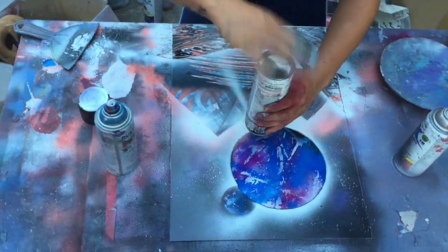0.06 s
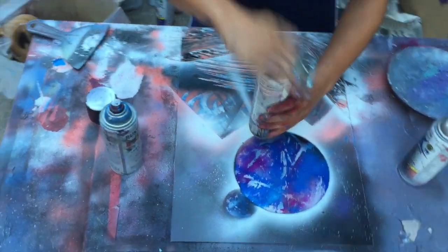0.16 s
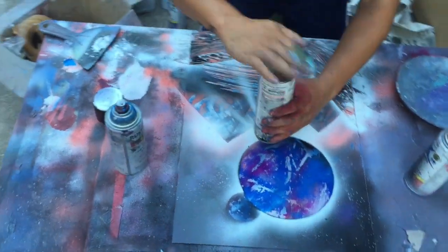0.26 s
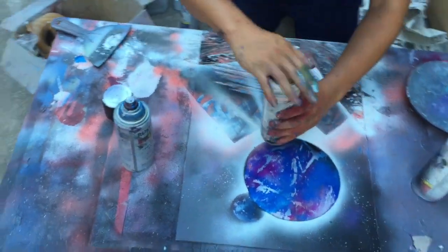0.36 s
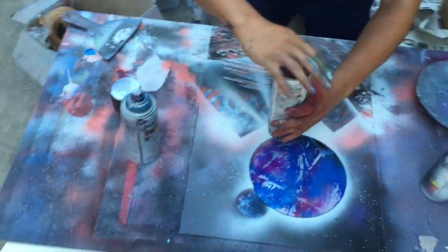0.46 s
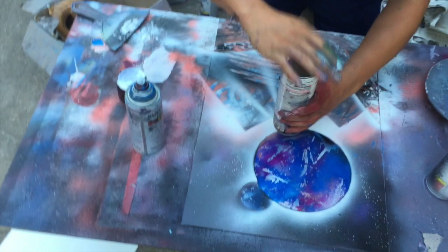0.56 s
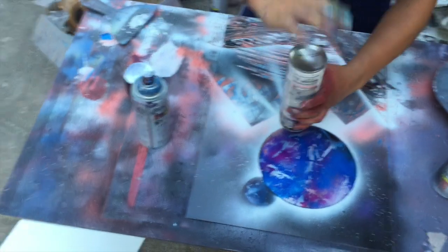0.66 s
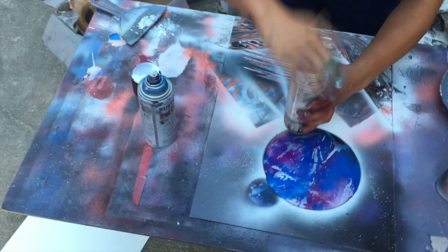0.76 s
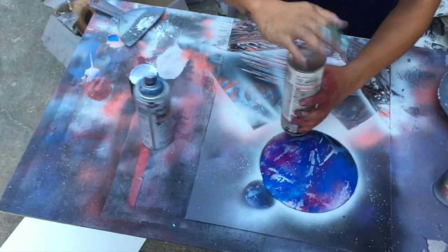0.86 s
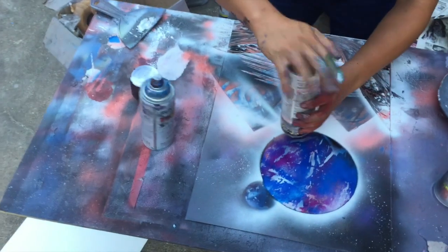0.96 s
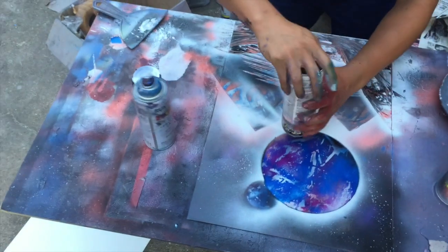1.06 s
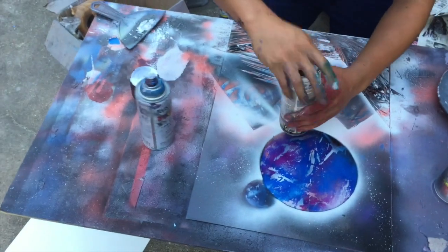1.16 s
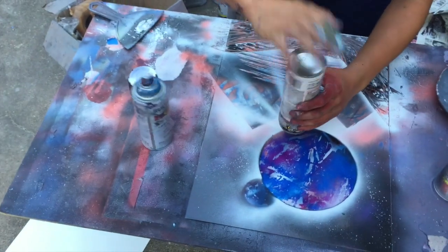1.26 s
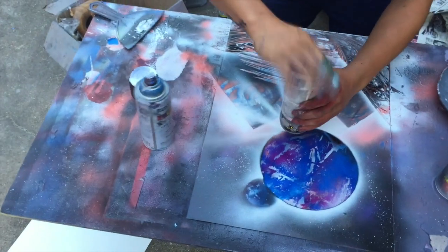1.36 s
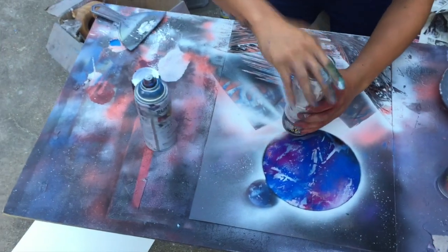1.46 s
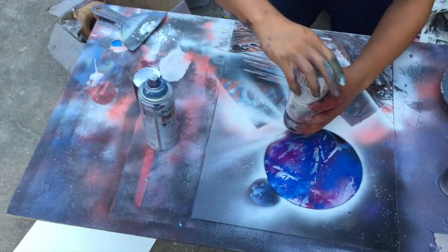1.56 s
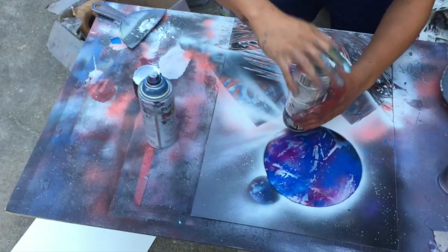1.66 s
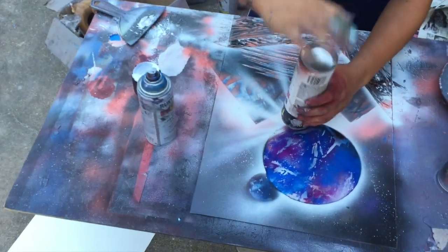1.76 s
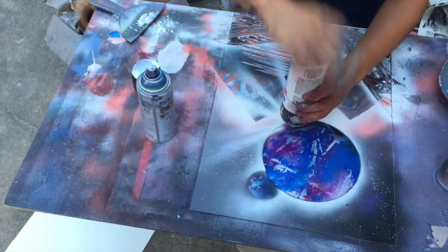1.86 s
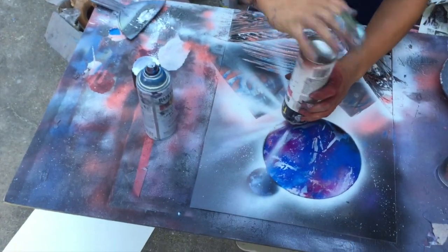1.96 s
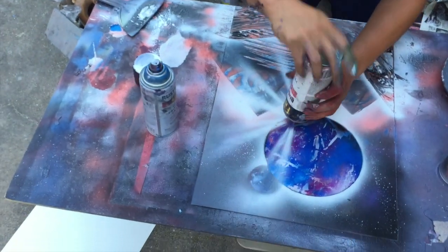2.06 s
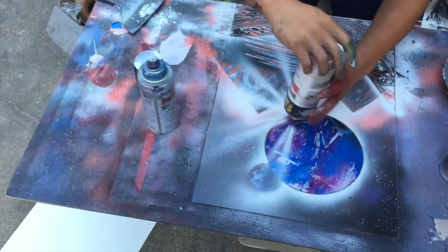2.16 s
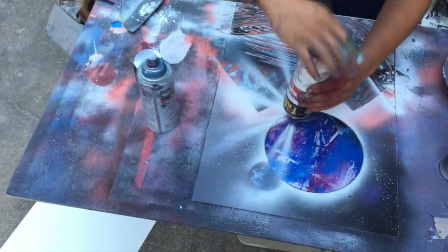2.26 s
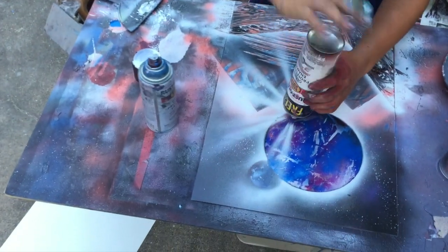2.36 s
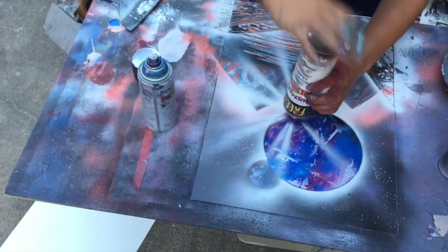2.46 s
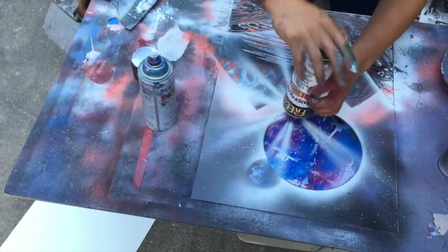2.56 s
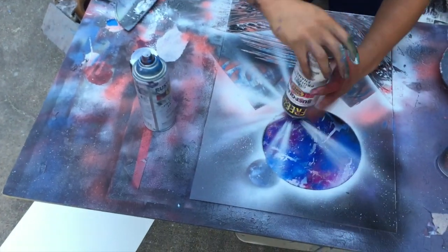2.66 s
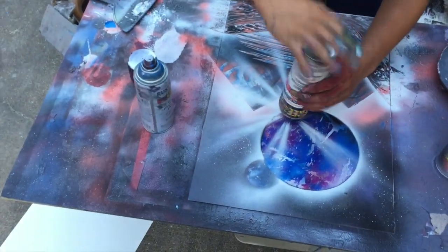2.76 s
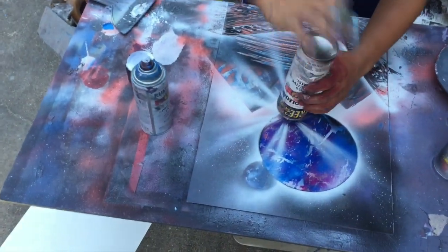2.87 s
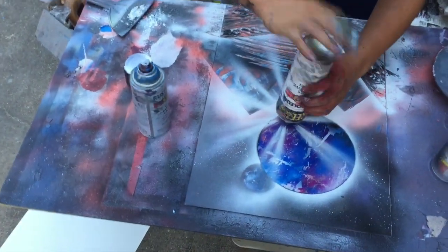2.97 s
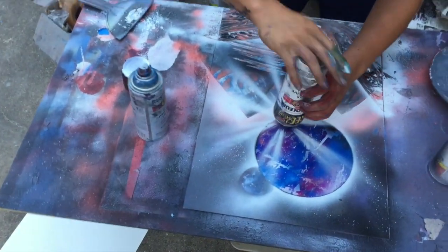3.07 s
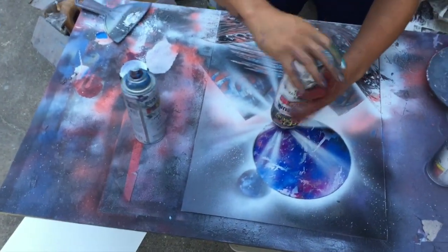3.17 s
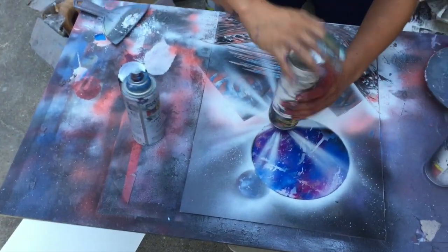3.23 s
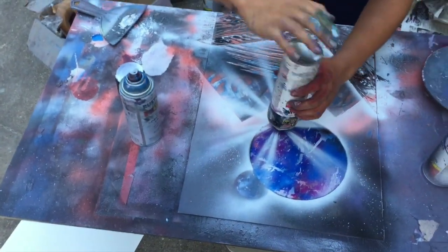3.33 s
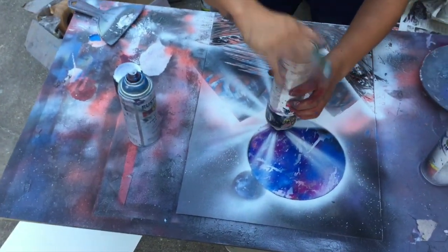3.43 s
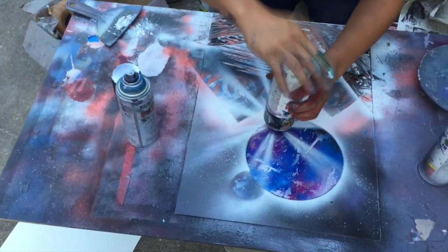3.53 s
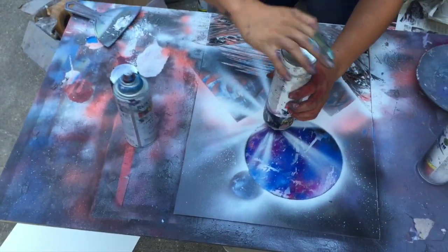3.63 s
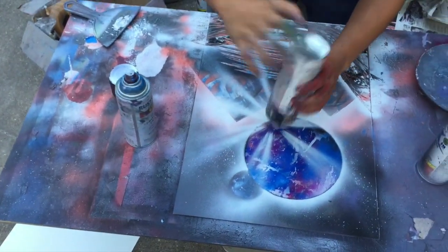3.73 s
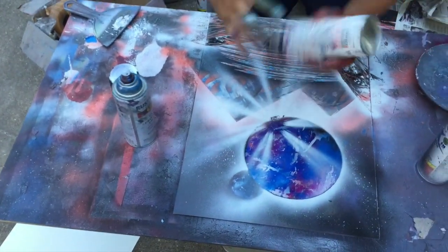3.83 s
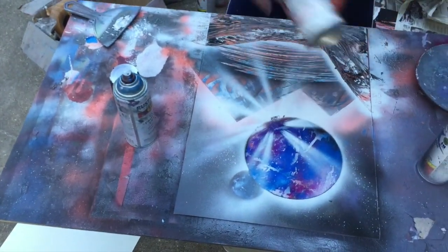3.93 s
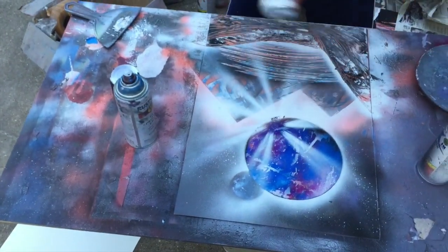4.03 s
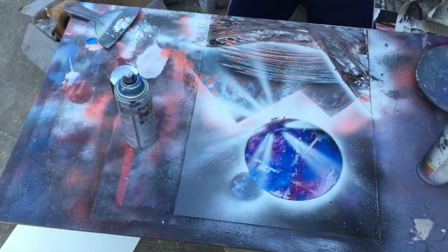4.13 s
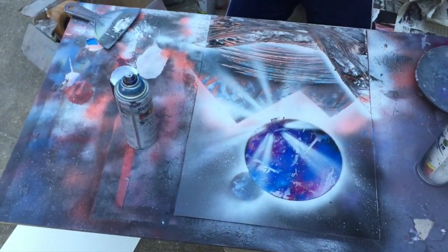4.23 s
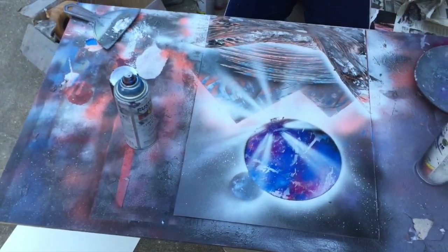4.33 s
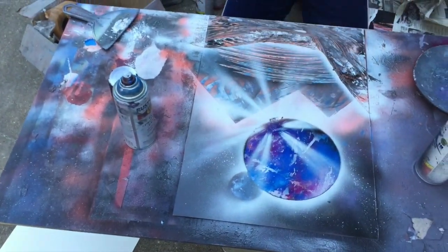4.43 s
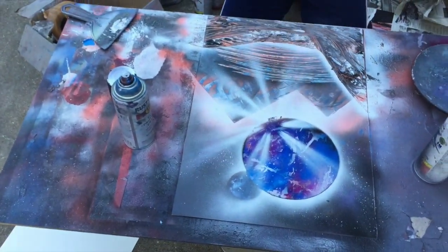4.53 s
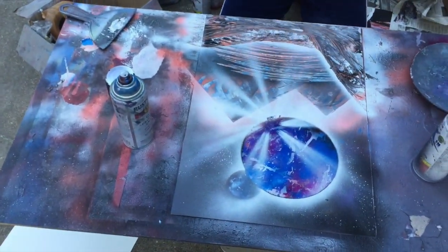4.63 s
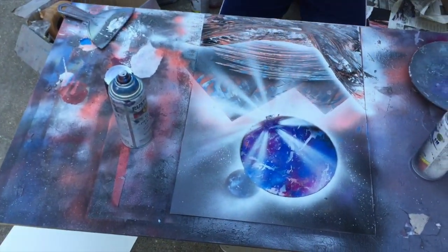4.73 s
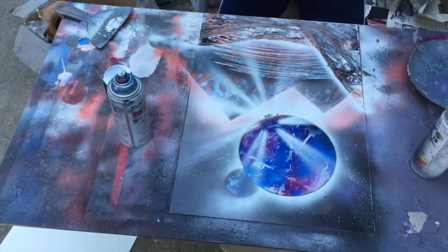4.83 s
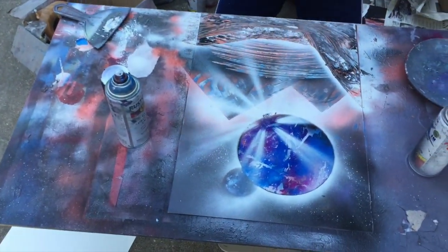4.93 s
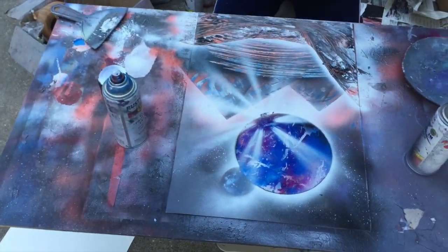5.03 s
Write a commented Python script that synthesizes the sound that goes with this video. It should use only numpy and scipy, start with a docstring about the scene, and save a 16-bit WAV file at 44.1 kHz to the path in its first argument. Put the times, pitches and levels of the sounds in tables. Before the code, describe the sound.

Pairs of hollow thumps from a spray can slapped on a table, with faint paint puffs, followed by light metallic rattling.

```python
"""First come pairs of pops and thuds: a palm slaps the base of a spray can standing upside down on a table.
Each tap thuds and bounces through the table, puffs paint from the nozzle and jogs the mixing ball.
Then the can is carried off, the ball clacking on the steel, with a thin hiss near the end.
One microphone hears it all in a quiet, open workshop."""
import sys
import numpy as np
from scipy import signal
from scipy.fft import rfft, irfft, next_fast_len
from scipy.io import wavfile
from scipy.ndimage import uniform_filter1d, map_coordinates

SR = 44100
rng = np.random.default_rng(int(sys.argv[2]) if len(sys.argv) > 2 else 0)


def put_to_file(sound):
    """Save the sound as 16-bit audio at rate SR, in the file named by the first command-line argument."""
    columns = np.atleast_2d(sound).T  # one column per channel
    safe = np.clip(columns, -1, 1)
    whole_steps = np.round(safe * 32767)
    wavfile.write(sys.argv[1], SR, whole_steps.astype(np.int16))


N = 224833

# Palm taps, in pairs: (time [s], push level [dB], push pitch [Hz], pop level [dB], pop pitch [Hz],
# rebound delay [s], rebound level [dB], settling delay [s], settling level [dB], puff level [dB],
# valve open [s], skip level [dB])
PALM_TAPS = [(0.2702, -31.5, 127, -38, 1734, .015, -42.5, 0.026, -36.5, -60.5, 0.042, -47),
             (0.3963, -29, 172, -58, 1630, .017, -40.5, 0.035, -45.5, -59, 0.049, -53.5),
             (0.8676, -26.5, 164, -40, 1586, 0.018, -35.5, 0.042, -36.5, -57, 0.037, -46),
             (1.0045, -23, 168, -46, 1650, .019, -28, 0.052, -33, -55, 0.049, -33.5),
             (1.4372, -27, 168, -38, 1720, .016, -37, 0.033, -39, -56, 0.027, -62),
             (1.562, -24.5, 174.5, -53, 1590, 0.024, -33.5, 0.053, -41, -55.5, .048, -40),
             (1.9785, -23.5, 151, -48, 1524, .015, -34, 0.033, -32, -53.5, .022, -43),
             (2.108, -22.5, 180, -44, 1740, 0.019, -30, 0.048, -33.5, -54, 0.038, -35.5),
             (2.509, -23.5, 155, -35.5, 1595, 0.015, -33, 0.038, -32.5, -55, 0.035, -42),
             (2.6293, -22, 165, -43.5, 1920, .018, -31, 0.041, -37, -55, .041, -35),
             (3.0005, -26, 172, -37, 1860, .016, -32, 0.031, -42, -57, 0.027, -45),
             (3.125, -23, 168, -39, 1885, .021, -33, 0.047, -36, -59, 0.064, -32),
             (3.496, -27.5, 143.5, -65, 1690, .014, -57, 0.027, -40, -58.5, .033, -80),
             (3.6332, -24, 175, -49, 1680, .018, -32, 0.062, -40, -56.5, 0.031, -36.5)]
# The board gives way just after the pop: (delay on a pair's first tap [s], on its second [s])
PUSH_LAG_S = [0.00397, 0.00084]
# The hand shifts the can on the board: (time [s], level [dB], main pitch [Hz])
NUDGES = [(1.142, -43, 238), (1.305, -46.5, 88), (1.354, -42, 176), (1.389, -48, 68.5), (2.599, -51, 127),
          (2.714, -40, 180), (2.746, -39, 220), (3.953, -51.5, 213)]
# The table's modes, the tones it rings at when hit. Ring time (t60) is how long a fade of 60 dB takes.
# (pitch [Hz], level [dB], ring time [s])
TABLE_MODES = [(72, 3, 0.2), (108, -2, 0.067), (130.5, 2.5, 0.13), (180.8, 8, 0.043), (205.4, 4, 0.078),
               (256.4, 3, 0.1), (316.5, -0.5, 0.077), (384.3, 7.5, 0.066), (505, -4.5, 0.071),
               (624.7, 3, 0.073), (744, -8, 0.04), (1038, -8, 0.055), (1240, -12, 0.025), (1674, 9, 0.017)]
# The steel can's modes: (pitch [Hz], level [dB], ring time [s])
CAN_MODES = [(1330, 2.5, 0.026), (1656, -6, 0.11), (1860, -2, 0.1), (2010, 6.5, 0.034), (2554, 3.5, 0.028),
             (2924, -3, 0.044), (3220, 14.5, 0.0058), (3440, -3, 0.054), (3760, 7.5, 0.017),
             (4188, -8.5, 0.091), (4630, -11.5, 0.18), (5720, 25.5, 0.0085), (6480, 10.5, 0.045),
             (7440, -9, 0.015), (9240, 17, 0.019), (13600, 7, .02)]
# Noise of loose things on the table and of brushing fingers: (frequency [Hz], level [dB])
RATTLE_SPECTRUM = [(300, -30), (700, 3), (1600, -6.5), (2500, -6.5), (3300, -14), (4500, -18.5),
                   (7000, -58)]
# Noise of the nozzle, also used for the ball's cracks: (frequency [Hz], level [dB])
JET_SPECTRUM = [(3000, -40), (4800, -4), (6200, 0), (8500, -1.5), (11500, 0.5), (13000, 0.5), (15500, -12)]
# The last hiss: (time [s], level [dB], length [s], fade [dB/s])
LAST_HISS = [(4.904, -59, .115, 20)]
# Its thin, bright noise: (frequency [Hz], level [dB])
HISS_SPECTRUM = [(3500, -37), (5200, -13), (6100, -5), (7500, -9), (9000, -4), (13600, -2.5), (15500, -13)]
# The ball touches the wall through paint: (time [s], level [dB], main pitch [Hz], ring time scale [x])
BALL_PINGS = [(0.4309, -43, 3440, 0.7), (0.4808, -53, 3440, .6), (0.8854, -39, 3350, 0.98),
              (0.9224, -46, 4200, .9), (0.936, -50.5, 3435, .8), (1.0081, -36, 3500, 0.9),
              (1.0554, -42, 4650, 1.2), (1.5635, -36.5, 3180, 0.73), (1.6142, -45, 4200, 0.99),
              (2.0324, -48, 4190, 1.9), (2.167, -39, 4234, 0.71), (2.601, -46, 3430, .6),
              (2.6524, -37, 3440, .6), (2.6844, -41, 4280, 0.82), (2.7753, -37, 3314, 0.73),
              (3.1474, -45, 4120, 1.2), (3.1714, -43, 4670, 1.6), (3.187, -47, 4220, 0.54),
              (3.1900, -44, 3400, 0.57), (3.1974, -40.5, 4230, .9), (3.255, -42.5, 3354, 0.91),
              (3.281, -43, 3360, 0.85), (3.5127, -31, 3380, 0.51), (3.726, -38, 3515, .8),
              (3.7703, -47, 3475, .8)]
# Fainter touches at random after each tap, one per entry: (main pitch [Hz])
JOG_HZ = [3440, 3440, 3440, 4220, 4200, 4630]
# The ball hits bare wall: (time [s], level [dB], main pitch [Hz], spread [octaves],
# ring time scale [x], second pitch [Hz], its relative level [dB])
BALL_CLACKS = [(2.551, -51.5, 6000, 1.3, 0.34, 9500, -10), (4.012, -38, 3120, 0.24, 1.06, 5900, -19),
               (4.025, -40.5, 2970, 0.42, 0.7, 5900, -13), (4.094, -33.5, 3070, 0.47, 0.68, 1870, -7),
               (4.111, -37.5, 1820, 0.38, 0.28, 9000, -9), (4.341, -48.5, 3000, 0.65, 0.33, 9000, -2),
               (4.357, -45, 4200, 0.44, 0.34, 2080, -0.5), (4.480, -47.5, 2230, 0.65, 0.28, 13600, -14),
               (4.594, -44, 2250, 0.25, 0.55, 6500, -25), (4.627, -49.5, 2960, 0.54, 0.35, 6500, -7),
               (4.713, -48, 1520, 0.19, 0.53, 3000, -20), (4.725, -47.5, 2930, 0.22, .5, 6000, -16),
               (4.963, -38.5, 1330, 0.28, 0.41, 2020, -15.5), (5.005, -59, 2000, 0.8, .43, 4200, -16),
               (5.031, -59, 1670, .3, .5, 3000, -20)]
# The workshop's echo: (frequency [Hz], ring time [s])
ROOM_DECAY = [(100, 0.27), (1000, 0.23), (8000, 0.064)]
# Distant rumble and hiss: (frequency [Hz], level [dB])
AIR_SPECTRUM = [(25, -5), (50, 4.5), (130, 0.5), (380, -9), (700, -12.5), (1200, -13), (3800, -18),
                (7000, -20), (15500, -22.5)]
# The microphone's tone: (frequency [Hz], gain [dB])
MIC_RESPONSE = [(20, -6), (45, 1.5), (70, 4.5), (4300, 1), (5000, -1.5), (5800, 0.5), (9800, -2),
                (10400, -7.5), (11000, -2)]

# Each list holds (first tap of a pair, second tap).
REBOUND_PUSH_DB, REBOUND_TREBLE_DB = [-25, -9], [-19.5, -2]  # relative to the tap's push; to the rap
REBOUND_HZ, SETTLE_HZ = 137, [163, 213]
SKIP_S, SKIP_TREBLE_DB = 0.009, -2  # a quick bright touch ahead of the rebound
SETTLE_RAP_DB, SETTLE_TREBLE_DB = -8.5, -19
ROCK_S, ROCK_DB, ROCK_HZ = 0.025, -13.5, 175  # each rock is about this much later and weaker
PUFF_LAG_S, PUFF_SAG_DB_PER_S = 0.0022, 63
JOG_WINDOW_S, JOG_DB, JOG_FADE_DB, JOG_RING_SCALE = 0.089, -54, 3.5, 0.76
CRACK_DB, CRACK_DB_PER_OCTAVE = -25, 13.5  # a hit with a wider spread cracks more
AIR_DB, TOP_HZ = -63, 15400


def palm():
    """Fingers brush the rim, then the air cupped between the palm and the dished base pops."""
    pops, t = np.zeros(N), np.arange(SR // 10) / SR
    for s, _, _, db, hz, *_ in PALM_TAPS:
        pop = ring(hz * np.array([1, 1.12]), db + np.array([13, 4]), t60=0.014, attack=0.0019, t=t)
        add(pops, s - 0.0015, pop)
    brush = bursts([(s - 0.006, 0) for s, *_ in PALM_TAPS], attack=0.0018, t60=0.024)
    return pops + amp(-51) * brush * noise(RATTLE_SPECTRUM)


def table():
    """Soft pushes ring the board's low tones, hard raps its high ones and the can; loose things rattle."""
    thuds, raps = landings()
    pushes = struck(thuds, TABLE_MODES, spread=0.62, ring_scale=0.64, attack=0.0021)
    board_hits = [(s, db, 720) for s, db, _ in raps]
    rebounds = struck(board_hits, TABLE_MODES, spread=4.1, ring_scale=0.84, attack=0.0014)
    can_hits = [(s, db + treble_db, 2400) for s, db, treble_db in raps]
    shell = struck(can_hits, CAN_MODES, spread=0.19, ring_scale=0.84, attack=0.0022)
    jolts = bursts([(s, db) for s, db, _ in can_hits], attack=0.0019, t60=0.022)
    tremble = bursts([(s, db) for s, db, _ in thuds], attack=0.0016, t60=0.1)
    contacts = unit(amp(4.6 * unit(uniform_filter1d(rng.standard_normal(N), size=70))))  # uneven touches
    rattle = (amp(-2) * jolts + amp(-23.5) * tremble * contacts) * noise(RATTLE_SPECTRUM)
    return amp(2) * pushes + amp(-6.5) * rebounds + amp(-5.5) * shell + rattle


def landings():
    """Each tap drives the can down; it skips, rebounds, settles and rocks twice."""
    thuds = list(NUDGES)  # (time [s], level [dB], main pitch [Hz])
    raps = []  # (time [s], level [dB], relative treble [dB])
    chance = rng.standard_normal((len(PALM_TAPS), 2, 3))
    for k, tap in enumerate(PALM_TAPS):
        s, push_db, push_hz, _, _, rebound_s, rebound_db, settle_s, settle_db, _, _, skip_db = tap
        in_pair = k % 2
        thuds += [(s + PUSH_LAG_S[in_pair], push_db, push_hz),
                  (s + rebound_s, push_db + REBOUND_PUSH_DB[in_pair], REBOUND_HZ),
                  (s + settle_s, settle_db, SETTLE_HZ[in_pair])]
        raps += [(s + rebound_s - SKIP_S, skip_db, SKIP_TREBLE_DB),
                 (s + rebound_s, rebound_db, REBOUND_TREBLE_DB[in_pair]),
                 (s + settle_s, settle_db + SETTLE_RAP_DB, SETTLE_TREBLE_DB)]
        for rock, (later, louder, higher) in enumerate(chance[k], 1):
            at = s + settle_s + ROCK_S * (rock + 0.1245 * later)
            db = settle_db + ROCK_DB * rock + 2 * louder
            thuds.append((at, db, ROCK_HZ * np.exp(0.2 * higher)))
            raps.append((at, db + SETTLE_RAP_DB, SETTLE_TREBLE_DB))
    return thuds, raps


def ball_pings():
    """Sloshing paint muffles all but a few of the tones the ball rings, and makes them flutter."""
    delays = rng.random((len(PALM_TAPS), len(JOG_HZ)))
    jogs = [(tap[0] + JOG_WINDOW_S * late, JOG_DB - JOG_FADE_DB * late, hz, JOG_RING_SCALE)
            for tap, row in zip(PALM_TAPS, delays) for late, hz in zip(row, JOG_HZ)]
    touches = np.array(BALL_PINGS + jogs)
    slosh = uniform_filter1d(uniform_filter1d(rng.standard_normal(N), size=130), size=130)
    pings = struck(touches[:, :3], CAN_MODES, spread=0.051, ring_scale=touches[:, 3], attack=0.00055)
    return amp(-4.5 + 4 * unit(slosh)) * pings


def ball_clacks():
    """On bare steel the ball rings two groups of tones and makes a sharp crack."""
    s, db, main_hz, spread, ring_scale, second_hz, second_db = np.transpose(BALL_CLACKS)
    clacks = struck(np.transpose([s, db, main_hz]), CAN_MODES, spread, ring_scale, attack=0.00069)
    second_hits = np.transpose([s, db + second_db, second_hz])
    clacks += struck(second_hits, CAN_MODES, spread=0.22, ring_scale=ring_scale, attack=0.0012)
    crack_db = db + CRACK_DB + CRACK_DB_PER_OCTAVE * spread
    cracks = bursts(np.transpose([s, crack_db]), attack=0.00054, t60=0.03) * noise(JET_SPECTRUM)
    return clacks + amp(7) * cracks


def spray():
    """Each tap opens the valve for a puff of paint; a thinner hiss comes near the end."""
    openings = [(s + PUFF_LAG_S, db, open_s, PUFF_SAG_DB_PER_S) for s, *_, db, open_s, _ in PALM_TAPS]
    puffs = jet(openings, JET_SPECTRUM, closing_db_per_s=327)
    return puffs + jet(LAST_HISS, HISS_SPECTRUM, closing_db_per_s=699)


def jet(openings, spectrum, closing_db_per_s):
    """Rushing gas snaps on, sags while the valve is open, then dies away; droplets make it patchy."""
    flow, t = np.zeros(N), np.arange(SR // 3) / SR
    for s, db, open_s, sag in openings:
        flow_db = db - sag * t - closing_db_per_s * np.maximum(t - open_s, 0)
        add(flow, s, amp(flow_db) * (1 - np.exp(-t / 0.0048)))
    bands = signal.stft(noise(spectrum), nperseg=256)[2]
    patches = uniform_filter1d(rng.standard_normal(bands.shape), size=2, axis=0)  # smooth over frequency
    patch_db = 3 * unit(uniform_filter1d(patches, size=8, axis=1))  # and over time
    return flow * unit(signal.istft(bands * amp(patch_db), nperseg=256)[1][:N])


def workshop_echo(sound):
    """The room answers with a short echo whose high frequencies die first."""
    hz, t, bands = signal.stft(rng.standard_normal(SR // 2), SR, nperseg=256)
    fade = amp(-60 * t / curve_at(ROOM_DECAY, hz)[:, None])
    tail = signal.istft(bands * fade, SR, nperseg=256)[1]
    return signal.fftconvolve(np.pad(sound, (400, 0)), tail / np.linalg.norm(tail))[:N]


def air():
    """Distant rumble and hiss, drifting slowly in level."""
    drift = map_coordinates(rng.standard_normal(40), [np.arange(N) * 4.9 / SR])
    return amp(AIR_DB + 0.6 * drift) * noise(AIR_SPECTRUM)


def struck(hits, modes, spread, ring_scale, attack):
    """Each hit (time [s], level [dB], main pitch [Hz]) rings the modes near its pitch, a bit at random."""
    out, t = np.zeros(N), np.arange(SR // 6) / SR
    hz, mode_db, t60 = np.transpose(modes)
    scatter_db = 2 * rng.standard_normal((len(hits), len(hz)))
    each = np.ones(len(hits))
    for hit, octaves, scale, random_db in zip(hits, spread * each, ring_scale * each, scatter_db):
        s, db, main_hz = hit
        nearness_db = -12 * np.abs(np.log2(hz / main_hz)) / max(octaves, 0.03)
        heard = nearness_db > -40
        levels = (db + mode_db + nearness_db + random_db)[heard]
        ring_s = t60[heard] * max(scale, 0.1)
        add(out, s, ring(hz[heard], levels, ring_s, attack, t[t < max(ring_s, default=0)]))
    return out


def ring(hz, db, t60, attack, t):
    """Fading sine tones with a soft start; every other one swings the opposite way."""
    sign = (-1) ** np.arange(len(hz))
    tones = sign * amp(db - 60 * t[:, None] / t60) * np.sin(2 * np.pi * hz * t[:, None])
    return tones.sum(axis=1) * (1 - np.exp(-t / attack)) ** 2


def bursts(events, attack, t60):
    """A loudness curve that jumps up and fades at each (time [s], level [dB])."""
    out, t = np.zeros(N), np.arange(SR // 6) / SR
    for s, db in events:
        add(out, s, amp(db - 60 * t / t60) * (1 - np.exp(-t / attack)))
    return out


def noise(spectrum):
    """Noise shaped by a spectrum, at a standard strength."""
    return unit(filtered(rng.standard_normal(N), lambda hz: amp(curve_at(spectrum, hz))))


def filtered(x, response):
    """Turns each frequency of x up or down by response(hz)."""
    size = next_fast_len(len(x) + 8192)
    return irfft(rfft(x, size) * response(np.fft.rfftfreq(size, 1 / SR)), size)[:len(x)]


def curve_at(points, hz):
    """Reads between (frequency [Hz], value) points, with octaves evenly spaced."""
    point_hz, values = np.transpose(points)
    return np.interp(np.log(hz + 1), np.log(point_hz + 1), values)


def add(track, s, sound):
    """Mixes a sound in at time s."""
    part = track[round(s * SR):][:len(sound)]
    part += sound[:len(part)]


def amp(db):
    """Turns decibels into a multiplier."""
    return 10 ** (np.asarray(db) / 20)


def unit(x):
    """Scales x to an average strength (rms) of 1."""
    return x / np.sqrt(np.mean(x ** 2) + 1e-20)


def scene():
    """The can at arm's length, its echo and the background."""
    can = palm() + table() + spray() + ball_pings() + ball_clacks()
    return (can + amp(-14) * workshop_echo(can) + air())[None]


def record(dry):
    """The microphone thins the deepest bass, dips twice in the treble and keeps nothing above TOP_HZ."""
    return filtered(dry[0], lambda hz: amp(curve_at(MIC_RESPONSE, hz)) * (hz < TOP_HZ))[None]


dry = scene()
out = record(dry)
put_to_file(out)
```